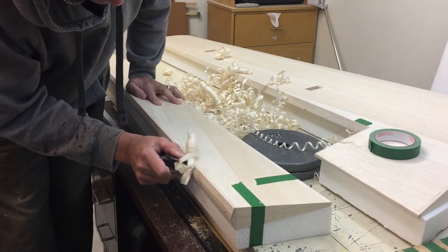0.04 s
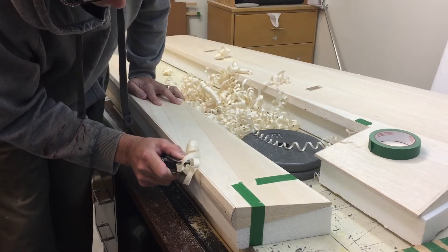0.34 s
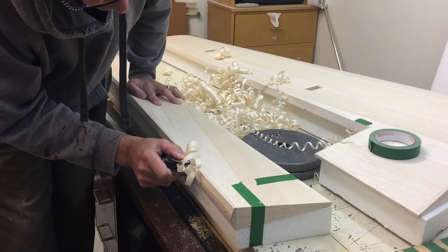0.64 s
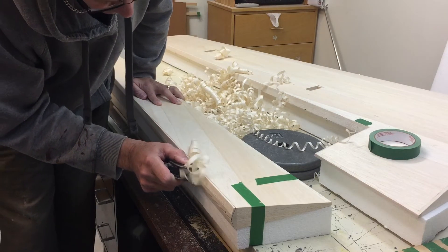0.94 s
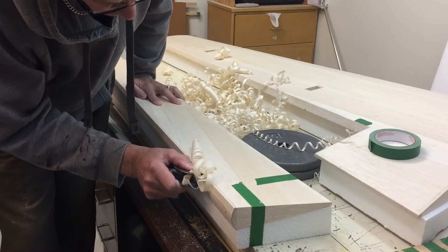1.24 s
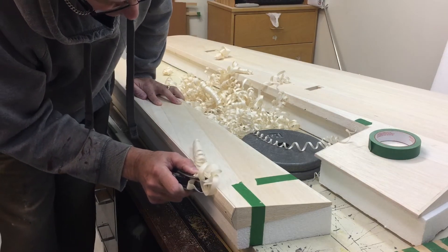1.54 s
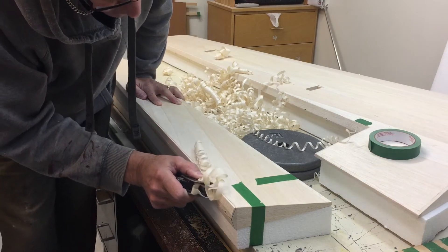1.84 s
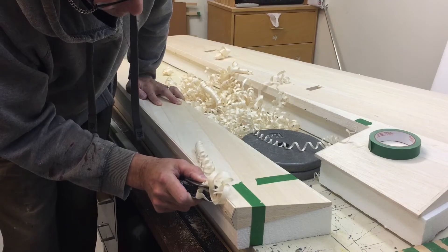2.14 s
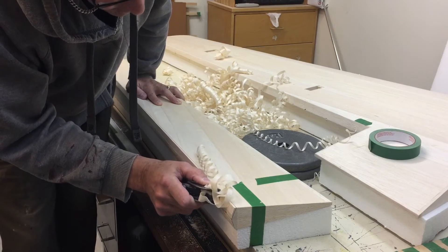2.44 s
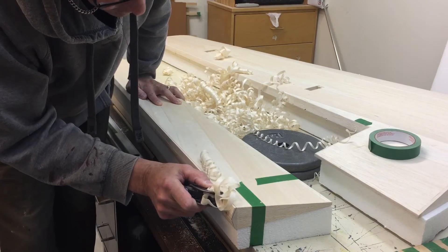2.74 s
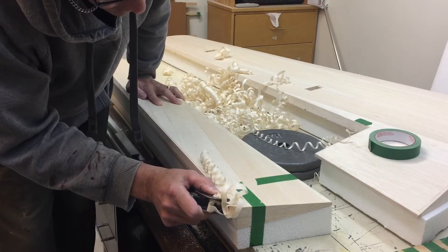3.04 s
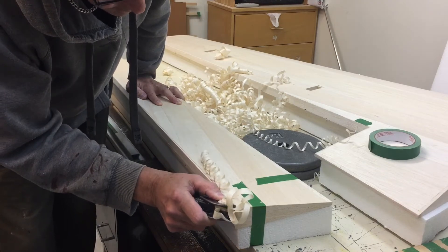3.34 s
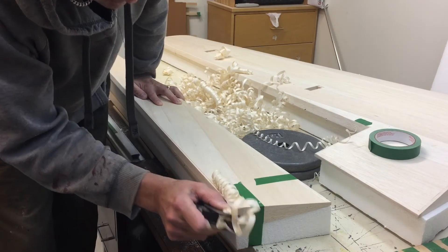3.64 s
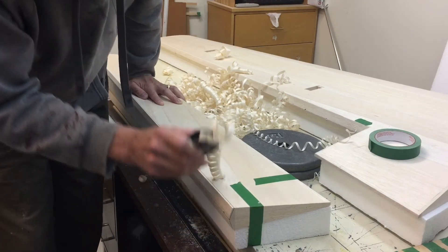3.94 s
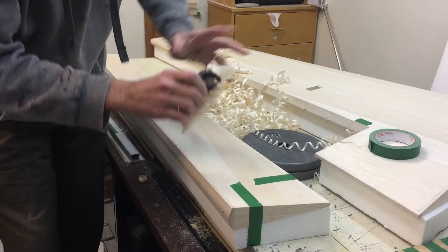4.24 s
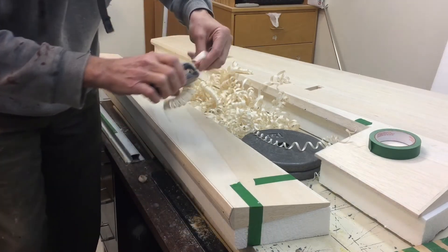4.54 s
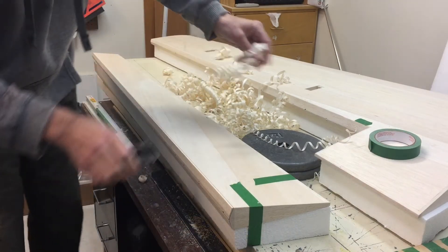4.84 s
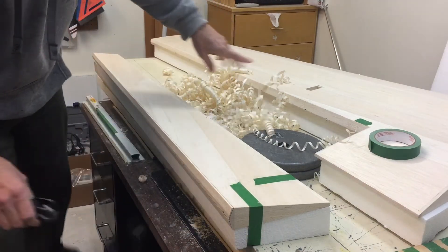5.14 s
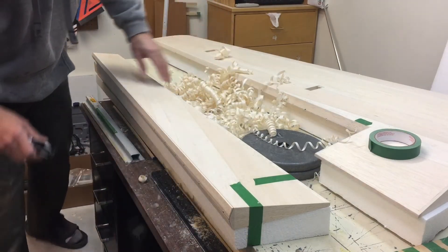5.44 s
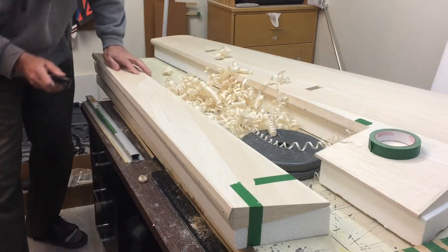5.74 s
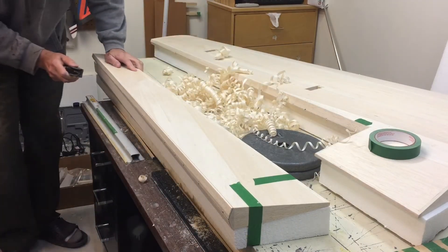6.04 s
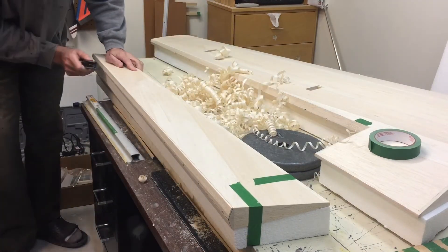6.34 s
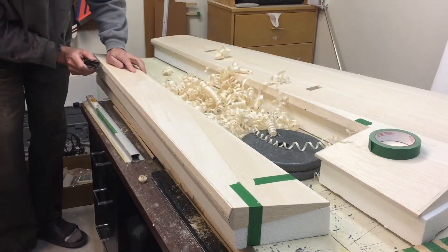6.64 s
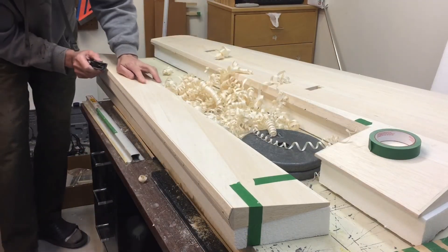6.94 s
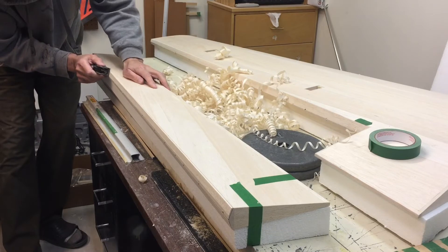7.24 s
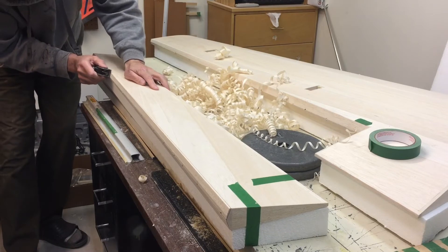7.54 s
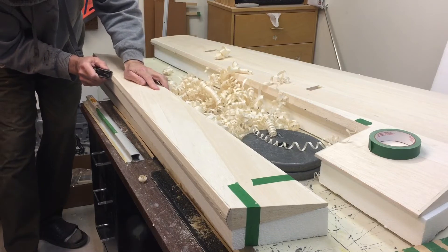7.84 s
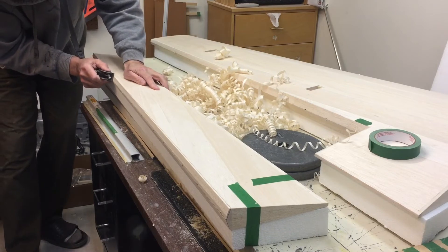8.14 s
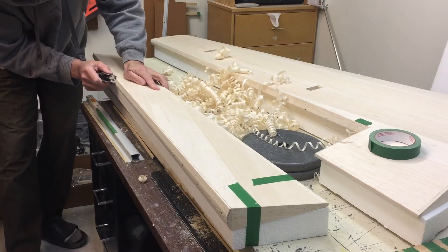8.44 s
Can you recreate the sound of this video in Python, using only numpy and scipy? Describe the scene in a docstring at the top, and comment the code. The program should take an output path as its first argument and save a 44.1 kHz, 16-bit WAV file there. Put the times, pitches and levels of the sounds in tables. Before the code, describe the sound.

Dry, uneven scraping of a hand plane on soft wood, with crackling shavings, a sliding hand and light knocks over faint room hiss.

```python
"""A workbench in a small room, with faint hiss and mains hum. A small hand plane takes one halting stroke
down a balsa block in several pushes: its blade tears fibres, and the tiny fractures excite the block's
resonances. The curl is pulled from the plane's mouth, crumples and is dropped. A hand sweeps over the
wood with a hiss of friction; the plane is set down with two knocks and starts again at the block's head."""
import sys
import numpy as np
from scipy import signal
from scipy.fft import rfft, irfft
from scipy.io import wavfile

SR = 44100
rng = np.random.default_rng(int(sys.argv[2]) if len(sys.argv) > 2 else 0)


def int16_out(signal):
    """Quantize to a 16-bit WAV file."""
    q = np.round(np.clip(np.atleast_2d(signal).T, -1, 1) * 32767)
    wavfile.write(sys.argv[1], SR, q.astype(np.int16))


N = 374848
TIME, FREQS = np.arange(N) / SR, np.fft.rfftfreq(N, 1 / SR)

# Spectrum of the hiss. Each row: frequency in Hz, relative density in dB.
HISS_SPECTRUM = [(15, -40), (27, -17.5), (133, -6.5), (371, -12.5), (437, -19.5), (637, -17), (769, -18.5),
                 (834, -19.5), (905, -14), (1640, -19.5), (1870, -18.5), (9210, -26), (10300, -29),
                 (11700, -31), (15800, -34)]
# Tones of the hum. Each row: frequency in Hz, level in dB.
HUM_TONES = [(60, -84.5), (118.6, -89.5), (263.8, -88.5)]
# Reverberation time. Each row: frequency in Hz, time to fall 60 dB (T60) in seconds.
ROOM_T60 = [(150, 0.11), (1000, 0.12), (4000, 0.068), (14000, 0.05)]
# Reflected sound. Each row: frequency in Hz, gain in dB.
ROOM_REFLECTION = [(200, -14), (1500, -15), (4000, -10.5), (14000, -9)]
# Dips and peak of the microphone port. Each row: frequency in Hz, width in Hz, height in dB.
PORT_MODES = [(4890, 370, -3.5), (10460, 480, -2.5), (11300, 650, 2.5)]

# Spectral envelopes of the sliding hand, the curl, and the cut at the block's middle, foot and head.
# Each row: frequency in Hz, relative density in dB.
SWEEP_TONE = [(60, -26), (200, -3.5), (600, -15.5), (1100, -3), (2800, 2.5), (6000, -4.5), (9500, 2.5),
              (12500, -9), (15500, -12)]
CURL_TONE = [(100, -22), (300, -13), (700, -6.5), (1000, -5), (1600, 1.5), (1950, -5), (2400, 4.5),
             (3300, -1.5), (5400, 0), (7800, -3), (9300, 0), (12500, -9), (15500, -12)]
MIDDLE_TONE = [(60, -37.5), (140, -25.5), (400, 3), (750, -5), (1200, -5), (1950, -0.5), (2150, -24),
               (2400, -7.5), (4300, -16), (9500, -20), (12500, -28.5), (15500, -30.5)]
FOOT_TONE = [(60, -32), (140, -15), (260, 0.5), (720, -7), (1400, 1.2), (1900, 0), (2100, -14),
             (4000, -4.5), (9500, -11), (12500, -24.5), (15500, -24)]
HEAD_TONE = [(60, -43), (120, -20), (250, -3), (600, -6.5), (1300, -9), (2500, -18), (5000, -25.5),
             (9500, -26.5), (12500, -35), (15500, -41)]
# Peaks (+) and dips (-) in the sound of each contact; the foot's 10.2 kHz dip is microphone colour.
# Each row: frequency in Hz, width in Hz, height in dB.
SWEEP_PEAKS = [(463, 57, 4.5), (665, 76, 5), (777, 89, 4), (950, 105, 5), (1330, 22, 10.5), (1647, 150, 8),
               (2004, 570, -9.5), (2290, 680, 6), (5980, 1600, 6.5)]
MIDDLE_PEAKS = [(247, 17, -12), (297, 29, 7.5), (335.4, 35, -22), (389, 22, -6.5), (485, 48, -10),
                (536.3, 18, 8), (815, 134, -9), (834, 70, 11), (920, 97, 3.5), (1084, 40, 5),
                (1100, 19, -20.5), (1153, 97, 10), (1380, 23, -16), (1395, 30, 10.5), (1530, 20, -8),
                (1760, 34, -10), (1885, 115, -8.5), (2150, 103, 5.5), (2310, 31, 8), (2635, 26, -19),
                (2833, 53, 7), (2930, 26, 8), (2990, 260, -1.5), (3830, 480, 6.5), (4567, 470, 13),
                (4660, 370, -6.5), (5770, 610, 8), (7570, 1114, -4.5), (8400, 860, 2.5)]
FOOT_PEAKS = [(238, 27, -2.5), (275, 11, 10), (336, 34, -9), (410, 95, 6), (536.7, 32, 10.5), (673, 28, -6),
              (877, 47, 10), (1080, 31, 7), (1116, 22, -13), (1175, 35, 6.5), (1298, 130, -7.5),
              (1372, 45, -10), (1415, 80, 9), (1960, 15, 3.5), (2120, 27, 5), (2340, 220, 11),
              (2540, 47, -7), (2780, 140, 12), (2790, 22, -23), (3130, 56, 2), (3590, 58, -7),
              (3716, 84, 8), (4870, 490, -1), (5300, 65, -2), (5700, 82, 3), (6520, 491, -6),
              (6800, 100, 6), (7800, 1147, -6.5), (10200, 437, -5)]
HEAD_PEAKS = [(292, 18, 10.5), (496, 30, -21), (555, 48, -21), (1003, 39, 9.5), (1080, 23, -10),
              (1343, 68, 12.5), (1630, 59, 6.5), (2122, 110, -9.6), (2880, 80, -15), (3220, 1000, 6.5),
              (3960, 43, 11), (4300, 120, 11.5), (4880, 118, 13), (5850, 310, 8.5), (6370, 150, 11),
              (8136, 401, 4.5)]
# Modes rung by a knock. Each row: frequency in Hz, relative level in dB, T60 in seconds.
BENCH_MODES = [(168, -2.5, 0.035), (196.5, -1.5, 0.12), (283.6, 1.5, 0.17), (362.6, -7, 0.2),
               (429, -5.5, 0.094), (556, -1, 0.03), (664, -5.5, 0.059), (774, -5, 0.062), (916, 2, 0.042)]

# Faint creaks. Each row: start in seconds, level in dB, pitch in Hz, length in seconds.
CREAKS = [(0.472, -65.5, 1136, 0.029), (5.492, -60, 1166, 0.055), (6.476, -57, 1127, 0.02),
          (7.477, -55, 1340, 0.061)]
# Knocks of the block on the bench. Each row: start in seconds, gain in dB, centre of the rung band in Hz.
KNOCKS = [(3.015, -45, 250), (3.612, -46.5, 880), (3.643, -51, 850), (4.661, -50, 600), (4.673, -50, 494),
          (5.383, -52, 434), (5.396, -52.5, 430), (7.333, -45, 282), (7.3488, -38, 158.4),
          (7.460, -39, 416), (7.472, -38, 270)]
# Short ticks and scuffs: fibres snapping, the blade catching, the curl brushing, a hand touching down.
# Each row: start in seconds, level in dB, band centre in Hz, T60 in seconds.
TICKS = [(.2882, -35.5, 7100, 0.009), (1.25, -42.5, 7260, 0.023), (2.051, -50, 10530, 0.013),
         (2.222, -48.5, 9500, 0.021), (2.328, -53, 9500, 0.017), (2.607, -38, 7000, .015),
         (2.711, -41, 5830, 0.011), (2.8635, -42, 1700, .04), (3.5235, -42, 6600, 0.028),
         (3.646, -35, 4470, 0.008), (3.831, -59, 9600, 0.022), (4.2055, -56, 3500, 0.016),
         (4.6739, -23, 10500, 0.0046), (4.7842, -55, 7000, 0.014), (5.021, -48, 2240, 0.068),
         (5.648, -66, 5000, .08), (6.926, -33, 4000, .008), (6.945, -34.5, 3500, 0.0092),
         (6.991, -34, 6000, 0.012)]
# The curl crumpling. Each row: start in seconds, level in dB, T60 in seconds.
CRUMPLES = [(4.538, -50, .05), (4.611, -46, 0.044), (4.632, -39.5, 0.2), (4.675, -52, 0.093),
            (4.869, -46, 0.078), (4.928, -51, 0.076)]
# The curl lifted, pulled free and dropped.
# Each row: start, rise, hold and fall in seconds, rustle in dB, treble fizz in dB over the rustle.
RUSTLES = [(3.82, 0.15, 0.01, 0.07, -62.5, -1), (4.015, 0.071, 0.016, 0.017, -53.5, 2),
           (4.204, 0.3, 0.02, 0.041, -68.5, -6), (4.5, 0.052, 0.02, 0.053, -57.5, 7.5),
           (4.602, 0.028, 0.097, 0.022, -55, 4), (4.73, 0.03, 0.076, 0.04, -69, -2),
           (4.845, 0.017, 0.069, 0.065, -61.5, 6), (4.991, 0.03, 0.004, 0.033, -55, 1),
           (5.14, 0.076, 0.03, 0.06, -71.5, 2)]
# Sweeps of skin and sole, and short pushes of the plane. Each row: start, rise, hold and fall in seconds,
# bite (the middle band) in dB, then treble fizz, hollow body and low judder in dB over the bite.
SWEEPS = [(0.465, 0.012, 0.0074, 0.019, -75, -16, -10, -15), (5.44, 0.089, 0.01, 0.077, -70, -3, -9, -12),
          (5.636, 0.018, 0.081, 0.056, -55, 4.5, -10.5, -20),
          (5.73, 0.1, 0.293, 0.037, -59.5, 9.5, -15, -19),
          (5.969, 0.16, 0.006, 0.056, -50, -9.5, -15.5, -25), (6.06, 0.021, 0.04, 0.04, -59, -6, -4, -5),
          (6.574, 0.39, 0.19, 0.135, -50.5, 2, -16, -26), (7.035, 0.032, 0.03, 0.042, -48, -7, -3, -17),
          (7.294, 0.18, 0.039, 0.046, -59, 2.5, -6, -12), (7.572, 0.065, 0.004, 0.039, -53, -7, -4.5, -7)]
PUSHES = [(-0.056, 0.145, 0.032, 0.072, -44, -4.5, -3.5, -8),
          (0.189, 0.086, 0.024, 0.033, -49, -6.5, -5, -11.5),
          (2.851, 0.067, 0.099, 0.078, -39.5, -8, -8, -9.5),
          (3.132, 0.11, 0.235, 0.074, -44, -9, -11, -13.5),
          (3.59, 0.045, 0.004, 0.054, -50.5, -1.5, -3, -25), (7.686, 0.18, 0.17, 0.12, -49, -8.5, -2, -2),
          (7.92, 0.069, 0.01, 0.12, -53.5, -7, -6, 9), (8.092, 0.18, 0.32, 0.05, -45.5, -8.5, -5, 1),
          (8.39, 0.067, 0.05, 0.05, -51.5, 0, -8, 8)]
# The uneven bite of the one long push. Each row: time in seconds, bite in dB.
LONG_PUSH = [(0.69, -79), (0.712, -60), (0.821, -45.5), (0.881, -46), (0.949, -50.5), (1.058, -41.5),
             (1.152, -41.5), (1.33, -48.5), (1.366, -54.5), (1.47, -45.5), (1.607, -42.5), (1.65, -47),
             (1.92, -44), (2.03, -48), (2.18, -45.5), (2.235, -51.5), (2.422, -51), (2.633, -43),
             (2.714, -50), (2.764, -80)]
# Its colour at the usual bite, at start and end. Each row: fizz, hollow body, judder in dB over the bite.
LONG_PUSH_COLOUR = [(-4, -5.5, -9), (-11, -4.5, -16)]


def amp(db):
    """Amplitude grows tenfold for every 20 dB."""
    return 10 ** (np.asarray(db) / 20)


def unit(x):
    """Normalisation to an rms of 1."""
    return x / np.sqrt(np.mean(x ** 2) + 1e-20)


def curve_at(points, hz):
    """Interpolation on a logarithmic frequency axis."""
    f, value = np.transpose(points)
    return np.interp(np.log(hz + 1), np.log(f + 1), value)


def add(mix, start_s, sound):
    """Superposition: a sound adds to the mix from its start time."""
    part = mix[round(start_s * SR):][:len(sound)]
    part += sound[:len(part)]


def below(hz, order=8):
    """Low-pass weighting, one half at the cutoff."""
    return 1 / (1 + (FREQS / hz) ** order)


def response(tone, peaks=()):
    """A minimum-phase, hence causal, response: a spectral envelope with peaks and dips."""
    peaks_db = sum(height / (1 + (2 * (FREQS - hz) / width) ** 2) for hz, width, height in peaks)
    cepstrum = irfft(np.log(amp(curve_at(tone, FREQS) + peaks_db)), N)
    cepstrum[1:N // 2] *= 2
    cepstrum[N // 2 + 1:] = 0
    return np.exp(rfft(cepstrum))


def wander(hz):
    """Low-passed noise gives a random fluctuation of rms 1."""
    return unit(irfft(rfft(rng.standard_normal(N)) * below(hz, order=4), N))


def fibres(per_s, spread_db, smooth, clump_db, clump_hz):
    """Shot noise: tiny uneven fractures over smooth rubbing, bunching up along the grain."""
    size = amp(spread_db * np.minimum(rng.exponential(1, N), 5))
    clicks = size * rng.choice([-1, 1], N) * (rng.random(N) < per_s / SR)
    return unit(unit(clicks) + smooth * rng.standard_normal(N)) * amp(clump_db * wander(clump_hz))


def along_grain(x, patch_db, patch_hz, patch_s):
    """Spectral modulation: narrow bands of friction swell and fade as the contact moves along the grain."""
    spectra = signal.stft(x, SR, nperseg=512, noverlap=384)[2]
    per_hz = np.fft.fftfreq(spectra.shape[0], SR / 512)[:, None]
    per_s = np.fft.fftfreq(spectra.shape[1], 128 / SR)
    smoothing = np.exp(-(per_hz * patch_hz) ** 2 - (per_s * patch_s) ** 2)
    patches = unit(np.fft.ifft2(np.fft.fft2(rng.standard_normal(spectra.shape)) * smoothing).real)
    depth = np.linspace(0, 1, len(spectra))[:, None] ** .5  # the low modes are steadier
    return signal.istft(spectra * amp(patch_db * depth * patches), SR, nperseg=512, noverlap=384)[1][:N]


def band_gains(effort, db, colour_db):
    """Power laws of effort (1 = usual): fizz and judder grow faster than the bite."""
    growth = [1, 1.34, 1, 1.3]  # bite, fizz, hollow body, judder
    return np.array([amp(db + over) * effort ** power for over, power in zip([0, *colour_db], growth)])


def movements(rows, release_shape=1.43):
    """Incoherent sounds add in power: band gains of movements that swell, hold and die away."""
    power = np.zeros((len(rows[0]) - 4, N))
    for start, rise, hold, fall, db, *colour_db in rows:
        during = (TIME > start) & (TIME < start + rise + hold + 5 * fall)
        t = TIME[during] - start
        attack = np.sin(np.pi / 2 * np.minimum(t / rise, 1))
        release = np.exp(-(np.maximum(t - rise - hold, 0) / fall) ** release_shape)
        power[:, during] += band_gains(attack * release, db, colour_db) ** 2
    return np.sqrt(power)


def rub(gains, drive, body, trim_db):
    """Source and filter: friction excites a body, and each band follows its own gain."""
    low, middle, high = below(450), below(1150), below(5500)
    bands = [high - middle, 1 - high, middle - low, low]  # bite, fizz, hollow body, judder
    spectrum = rfft(drive) * body
    return amp(trim_db) * sum(gain * unit(irfft(spectrum * band, N)) for gain, band in zip(gains, bands))


def background(hiss_db=-67.5, drift_db=0.97, hum_waver_db=2.5):
    """Broadband hiss and the tones of mains hum, each under slow amplitude modulation."""
    hiss = unit(irfft(rfft(rng.standard_normal(N)) * amp(curve_at(HISS_SPECTRUM, FREQS)), N))
    hiss *= amp(hiss_db + drift_db * wander(4.4))
    hum = np.zeros(N)
    for hz, db in HUM_TONES:
        peak = np.sqrt(2) * amp(db + hum_waver_db * wander(2.3))
        hum += peak * np.sin(2 * np.pi * (hz * TIME + rng.random()))
    return hiss + hum


def room(x, gap_s=.004, echoes_per_s=3000):
    """Reverberation: dense reflections follow the direct sound and decay, the treble soonest."""
    t = TIME[:SR // 3]
    echoes = rng.choice([-1, 1], len(t)) * (rng.random(len(t)) < echoes_per_s / SR) * (t > gap_s)
    hz, delay_s, spectra = signal.stft(echoes, SR, nperseg=256)
    decay = amp(-60 * delay_s / curve_at(ROOM_T60, hz)[:, None])
    tail = signal.istft(spectra * decay, SR, nperseg=256)[1]
    reflected = irfft(rfft(x) * amp(curve_at(ROOM_REFLECTION, FREQS)), N)
    return x + signal.fftconvolve(reflected, tail / np.linalg.norm(tail))[:N]


def creaks(waver=0.061):
    """Frictional vibration: a contact slips for an instant with a small unsteady note."""
    out, unsteady = np.zeros(N), wander(160)
    for start, db, hz, length in CREAKS:
        pitch = hz * (1 + waver * unsteady[round(start * SR):][:round(length * SR)])
        note = np.sqrt(2) * np.sin(2 * np.pi * np.cumsum(pitch) / SR)
        add(out, start, amp(db) * np.hanning(len(note)) * note)
    return out


def knocks(rise_s=0.00061, octaves=0.84):
    """Modal ringing: each padded knock excites the damped low modes around its own centre pitch."""
    out, t = np.zeros(N), TIME[:SR // 3]
    hz, level, t60 = np.transpose(BENCH_MODES)[:, :, None]
    sign = (-1) ** np.arange(len(hz))[:, None]  # neighbouring modes swing in opposite directions
    modes = sign * amp(level - 60 * t / t60) * np.sin(2 * np.pi * hz * t)
    for start, db, centre in KNOCKS:
        share = np.exp(-.5 * (np.log2(hz / centre) / octaves) ** 2)
        add(out, start, amp(db) * (share * modes).sum(0) * (1 - np.exp(-t / rise_s)))
    return out


def ticks(octaves=0.98, lead_samples=32):
    """Transients: each short tick or scuff is a band of noise that decays exponentially."""
    out, t = np.zeros(N), TIME[:2048]
    hz = np.fft.rfftfreq(len(t), 1 / SR)
    for start, db, centre, t60 in TICKS:
        burst = rng.choice([-1, 1], len(t)) * amp(db - 60 * t / t60)
        band = np.exp(-.5 * (np.log2((hz + 1) / centre) / octaves) ** 2)
        colour = unit(band / (1 + (hz / 12500) ** 8))
        add(out, start - lead_samples / SR, irfft(rfft(np.roll(burst, lead_samples)) * colour))
    return out


def curl(flex_db=-14):
    """Friction and buckling: the dry shaving rustles, and collapses in short bursts when gripped."""
    body, gains = response(CURL_TONE), movements(RUSTLES)
    brushing = fibres(per_s=2200, spread_db=0.5, smooth=0.55, clump_db=2.5, clump_hz=70)
    drive = along_grain(brushing, patch_db=3.5, patch_hz=700, patch_s=0.06)
    rustle = rub(gains, drive, body, trim_db=-0.86)
    # the whole ribbon flexes too, giving a soft low body
    flex = amp(flex_db) * gains[0] * unit(irfft(rfft(brushing) * body * below(1070), N))
    crush = np.zeros(N)
    for start, db, t60 in CRUMPLES:
        add(crush, start, amp(db - 60 * TIME[:SR // 4] / t60))
    crackle = fibres(per_s=2300, spread_db=3.0, smooth=0.35, clump_db=0.5, clump_hz=150)
    crisp = 1 - 0.72 * below(4000) - .5 * (1 - below(10000))  # folds crack mostly in the upper middle
    return rustle + flex + crush * unit(irfft(rfft(crackle) * body * crisp, N))


def hand():
    """Sliding friction: skin and the plane's sole draw a fine, bright hiss from the bare wood."""
    drive = fibres(per_s=4000, spread_db=1.5, smooth=1, clump_db=0.55, clump_hz=50.3)
    drive = along_grain(drive, patch_db=4, patch_hz=406, patch_s=0.14)
    return rub(movements(SWEEPS), drive, response(SWEEP_TONE, SWEEP_PEAKS), trim_db=-0.93)


def long_push(usual_bite_db=-45):
    """Amplitude modulation: the band gains follow the blade's uneven bite, and the cut grows duller."""
    times, bite_db = np.transpose(LONG_PUSH)
    start, end = times[0], times[-1]
    effort = amp(np.interp(TIME, times, bite_db - usual_bite_db)) * (TIME > start) * (TIME < end)
    colour_db = [np.interp(TIME, [start, end], ends) for ends in np.transpose(LONG_PUSH_COLOUR)]
    return band_gains(effort, usual_bite_db, colour_db)


def plane(foot_from_s=1.8, foot_by_s=2.36, head_from_s=6):
    """Forced vibration: tearing fibres drive the block, whose response depends on where the blade is."""
    tearing = fibres(per_s=7000, spread_db=1.7, smooth=0.79, clump_db=0.5, clump_hz=80)
    tearing = along_grain(tearing, patch_db=3.5, patch_hz=393, patch_s=0.082)
    gains = movements(PUSHES) + long_push()
    middle = rub(gains, tearing, response(MIDDLE_TONE, MIDDLE_PEAKS), trim_db=-1.3)
    foot = rub(gains, tearing, response(FOOT_TONE, FOOT_PEAKS), trim_db=-0.93)
    head = rub(gains, tearing, response(HEAD_TONE, HEAD_PEAKS), trim_db=-1.27)
    travel = np.interp(TIME, [foot_from_s, foot_by_s], [0, 1])
    return np.where(TIME > head_from_s, head, (1 - travel) * middle + travel * foot)


def scene():
    """All sources superpose at one microphone, the same in both channels."""
    mono = room(plane() + hand() + curl() + ticks() + knocks() + creaks()) + background()
    return np.array([mono, mono])


def record(dry, cutoff_hz=15850):
    """Filters in series: the microphone port colours the sound, then a low-pass limits its band."""
    heard = irfft(rfft(dry) * response([(0, 0)], PORT_MODES), N)
    low_pass = signal.firwin(511, cutoff_hz, window=("kaiser", 9), fs=SR)
    return signal.oaconvolve(heard, low_pass[None], "same")


dry = scene()
out = record(dry)
int16_out(out)
```